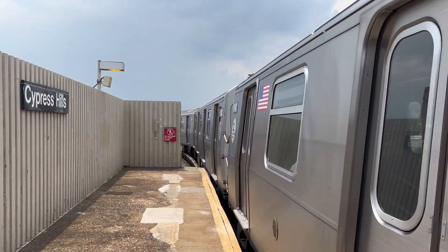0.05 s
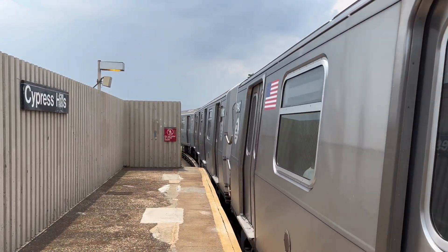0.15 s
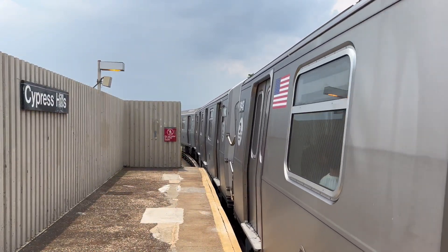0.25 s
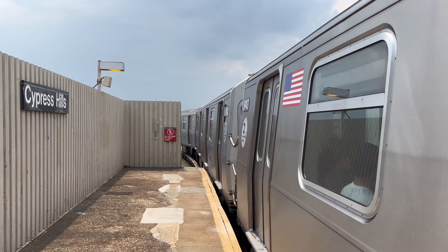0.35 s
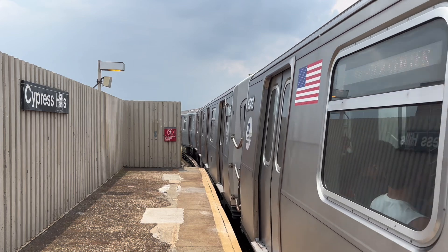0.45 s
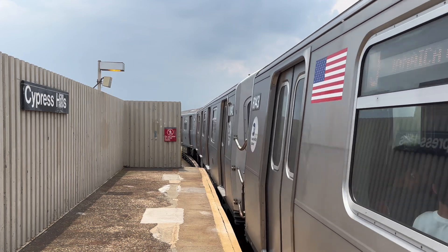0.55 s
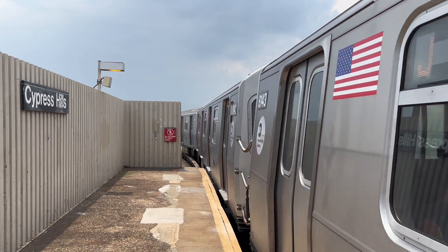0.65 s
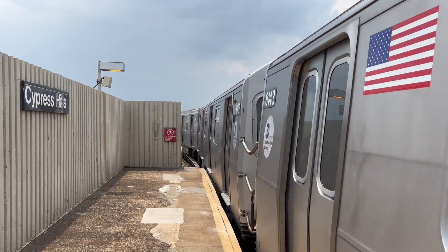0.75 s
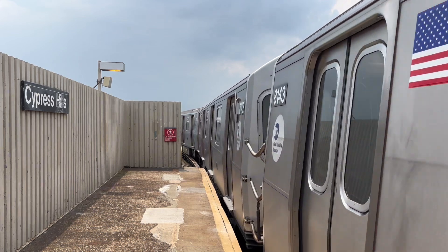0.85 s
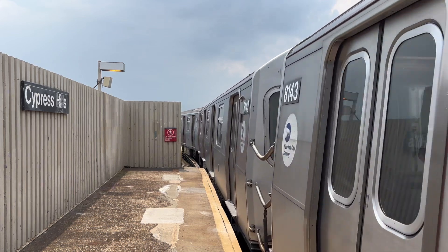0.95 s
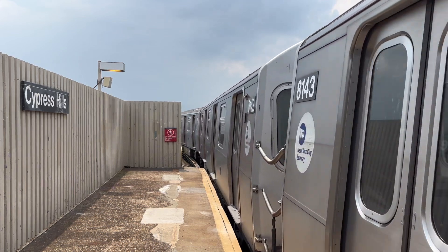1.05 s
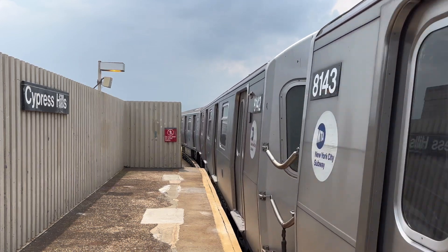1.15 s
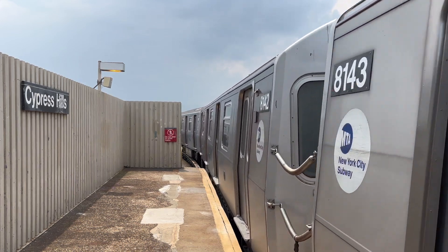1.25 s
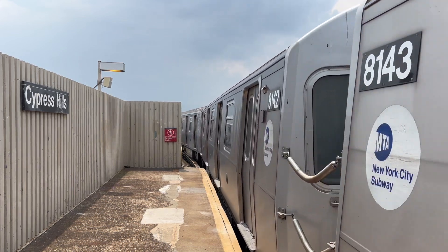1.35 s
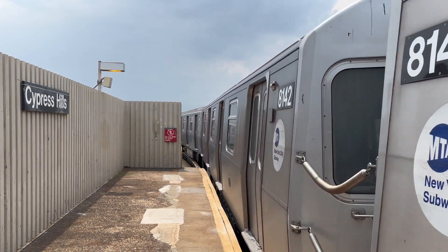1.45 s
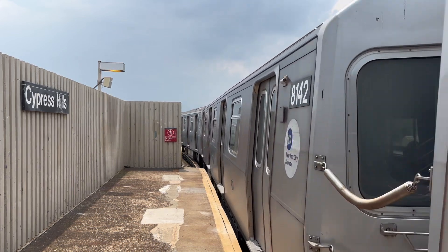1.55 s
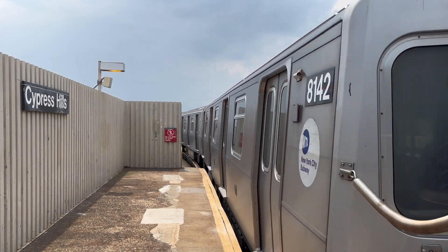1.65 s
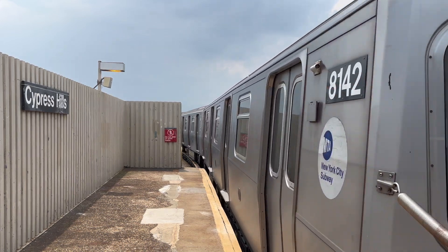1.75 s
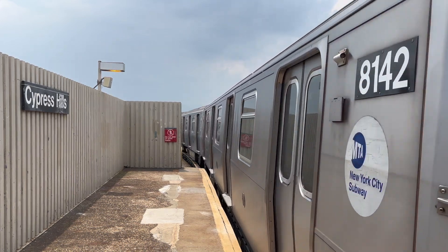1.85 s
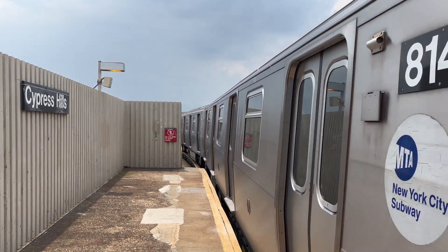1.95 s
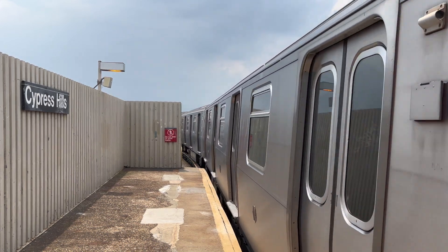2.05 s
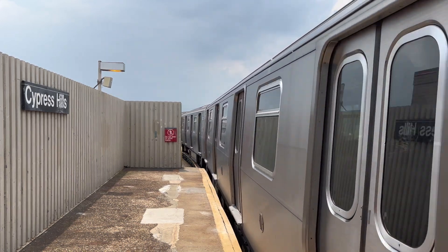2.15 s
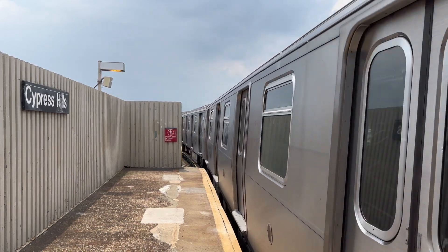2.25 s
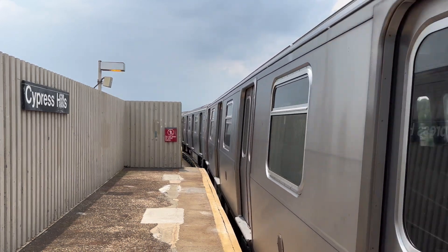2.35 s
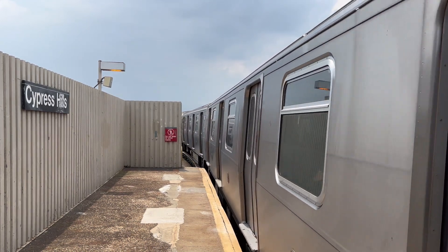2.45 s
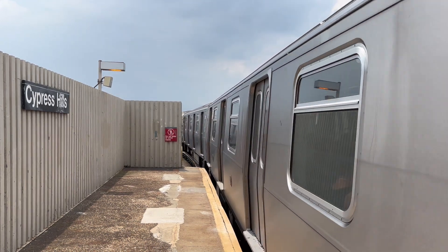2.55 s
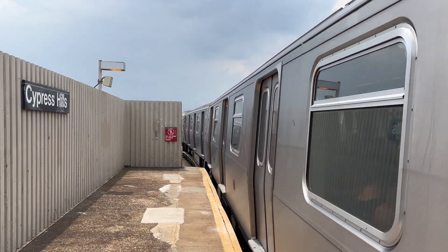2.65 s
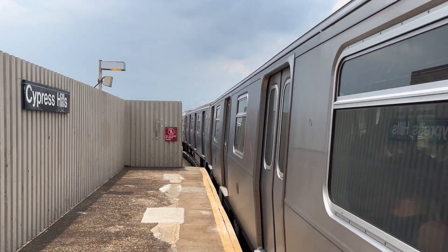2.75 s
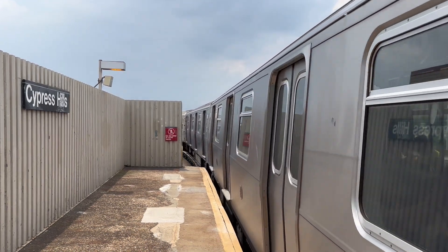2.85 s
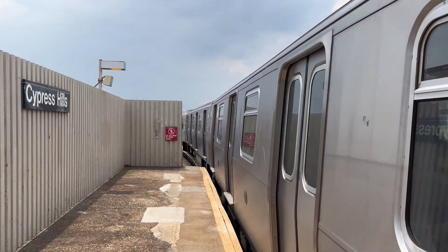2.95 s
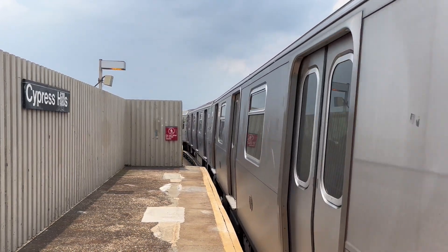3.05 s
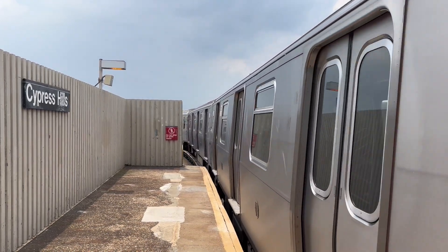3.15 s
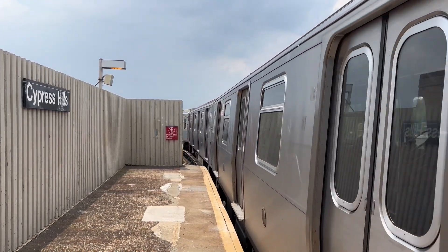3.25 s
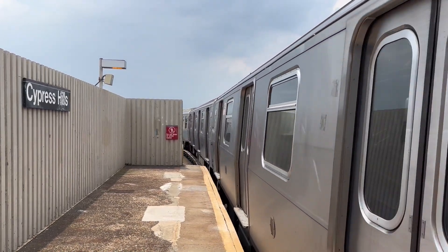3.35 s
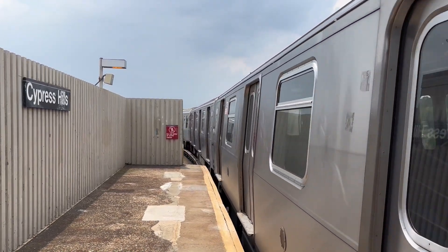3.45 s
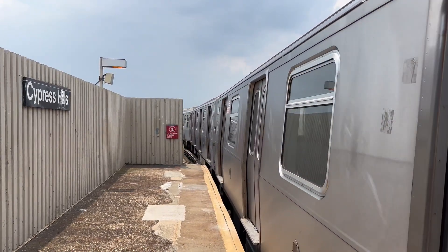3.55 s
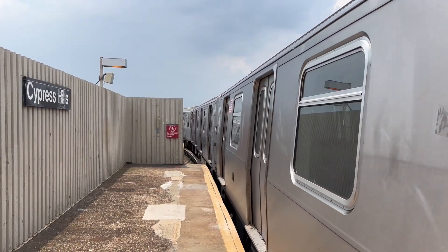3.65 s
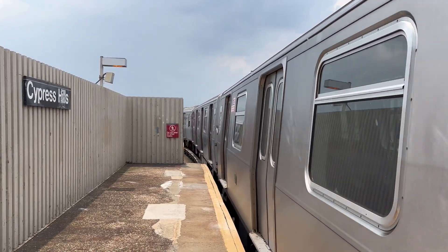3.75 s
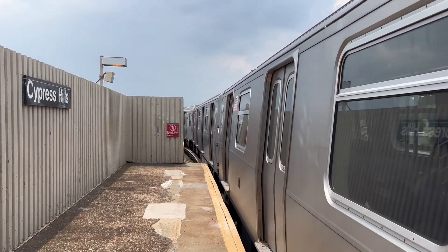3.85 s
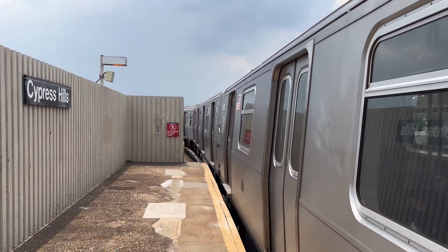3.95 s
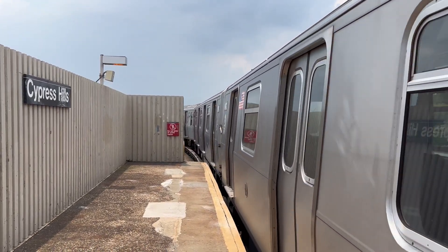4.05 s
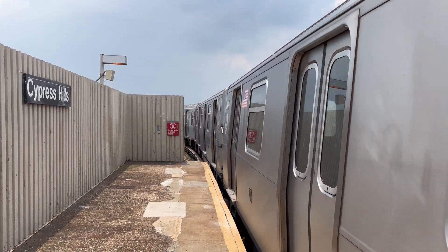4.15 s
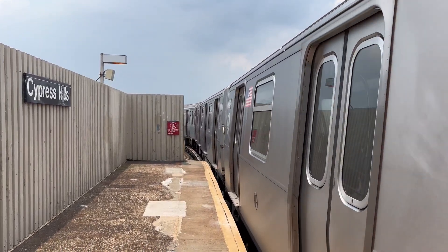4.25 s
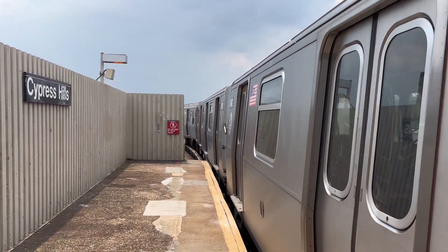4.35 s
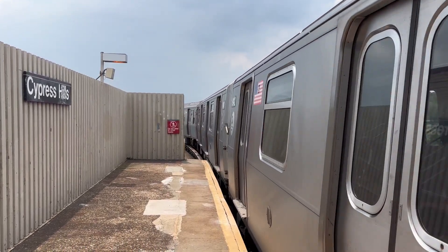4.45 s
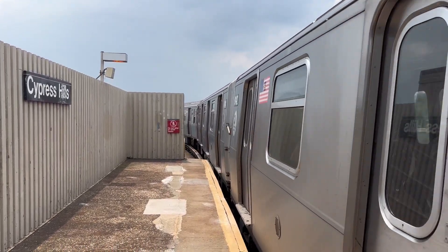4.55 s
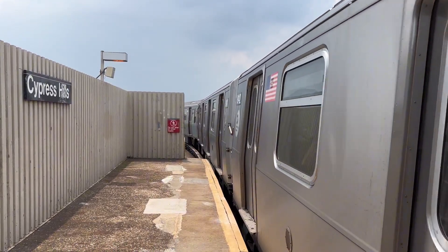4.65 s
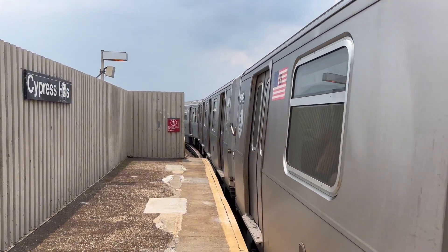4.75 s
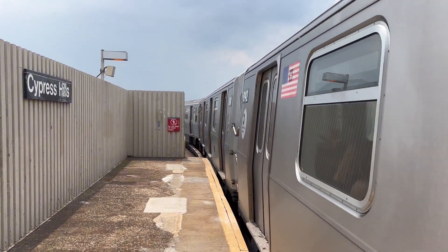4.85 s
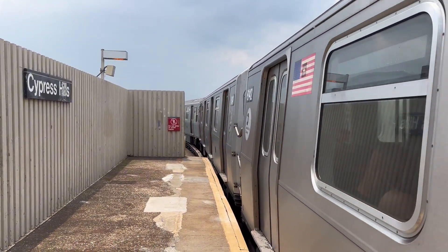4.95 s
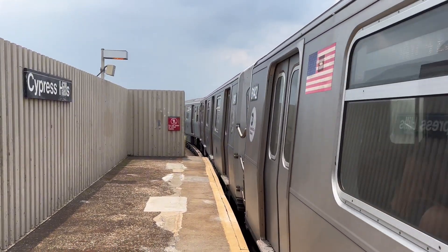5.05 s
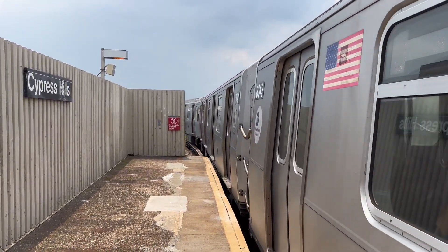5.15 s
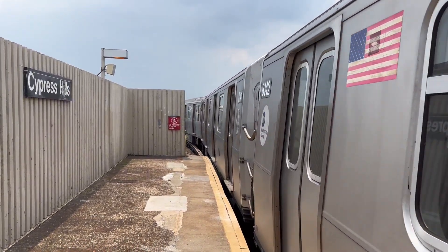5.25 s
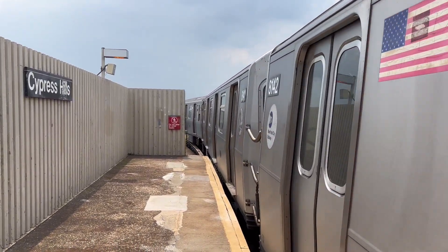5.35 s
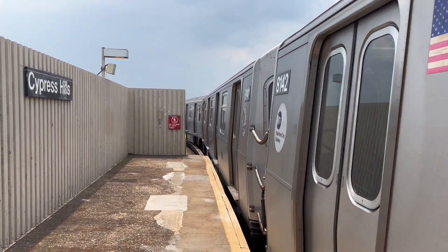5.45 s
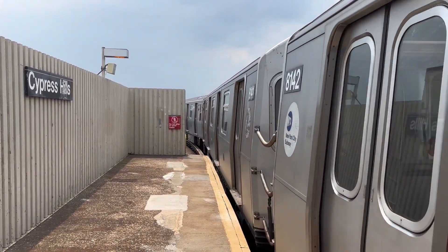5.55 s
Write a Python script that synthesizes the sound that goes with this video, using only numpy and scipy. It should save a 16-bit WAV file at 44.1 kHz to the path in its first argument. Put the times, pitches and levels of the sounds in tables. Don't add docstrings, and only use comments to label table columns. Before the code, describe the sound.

Close metal train wheels roll by with deep rumble and clustered clack-thuds, loose metal clinks, and high wheel squeal in two successive pitches.

```python
import sys
import numpy as np
from scipy import signal
from scipy.fft import rfft, irfft
from scipy.io import wavfile
from scipy.ndimage import uniform_filter1d

SR = 44100
rng = np.random.default_rng(int(sys.argv[2]) if len(sys.argv) > 2 else 0)


def store_wav(level_fs):
    pcm = np.round(np.clip(np.atleast_2d(level_fs), -1, 1) * 32767)
    wavfile.write(sys.argv[1], SR, pcm.T.astype(np.int16))


def level_to_linear(level):
    exponent = np.asarray(level, float) / 20
    return 10 ** exponent


N = 247401
T = np.arange(N) / SR
HZ = np.fft.rfftfreq(250000, 1 / SR)[1:]

# frequency in Hz, density in dB per Hz.
ROLL_COLOUR = [(20, -24), (36, -11), (52, 3.5), (90, -0.5), (220, -6), (580, -18), (1000, -22.5),
               (2560, -34), (4500, -39.5), (8200, -47), (10000, -48), (12500, -53.5), (15000, -52.5),
               (16000, -63)]
# time in seconds, level in dB.
TRUCK_LEVEL = [(0.0, -35.5), (0.28, -31), (0.47, -34), (1.22, -35.5), (1.37, -29), (1.75, -39.5),
               (1.87, -31.5), (2.22, -34), (2.94, -40), (3.17, -32.5), (3.33, -39), (3.7, -33.5),
               (3.81, -38.5), (4.06, -41), (4.27, -37.5), (4.69, -40), (4.89, -36), (5.61, -37.5)]
# frequency in Hz, dB per dB.
NEARNESS_SHARE = [(60, 0.7), (220, 0.62), (1000, 0.64), (4000, 0.85)]
# start in seconds, clack in dB, thud in dB, crack in dB, span in Hz.
JOINT_KNOCKS = [(0.199, -14.5, -7.5, -22, 184), (0.298, -20, -12.5, -32, 186), (0.398, -21, -42, -38, 215),
                (0.679, -11.5, -9, -23.5, 159), (0.739, -46, -15, -49, 109), (0.902, -22, -16.5, -35.5, 138),
                (1.328, -17, -7.5, -24, 167), (1.412, -19.5, -8.5, -29, 151),
                (1.697, -18.5, -13.5, -21.5, 159), (1.82, -11.5, -11.5, -25, 179),
                (1.888, -17.5, -5.5, -38, 172), (1.963, -17, -25, -47, 245), (4.685, -18.5, -9.5, -25, 181),
                (4.739, -23.5, -9, -33.5, 204), (4.805, -21, -16, -46, 141), (4.969, -36, -22, -44, 162),
                (5.226, -12, -14, -24, 144), (5.26, -29.5, -9, -41, 167.5),
                (0.02, -38, -37, -32, 127), (1.085, -23.5, -13, -46, 154), (1.512, -22, -13.5, -33, 160),
              (2.2, -24, -13, -48, 147), (2.413, -28, -18, -52, 169), (2.469, -20.5, -14, -32.5, 113),
              (2.583, -22, -10, -29, 144), (3.001, -19.5, -11.5, -55, 112), (3.086, -19.5, -11, -41, 222),
              (3.158, -25, -25, -43, 110), (3.493, -37, -20, -34, 205), (3.55, -21, -18, -46, 174),
              (3.675, -19.5, -19.5, -36, 166), (4.213, -27.5, -12, -65, 241), (4.27, -22, -21, -38, 111),
              (4.346, -35, -26, -52, 162)]
# frequency in Hz, t60 in seconds.
KNOCK_T60 = [(60, 0.084), (200, 0.53), (1000, 0.33), (4000, 0.29), (12000, 0.14)]
# frequency in Hz, rise in seconds.
KNOCK_RISE = [(60, 0.075), (200, 0.013), (1000, 0.0092), (12000, 0.00055)]
# frequency in Hz, level in dB, t60 in seconds.
RAIL_MODES = [(512, 10.5, 0.095), (685, 12, 0.042), (840, -18, 0.038), (960, -35, 0.091),
              (1043, -28, 0.044), (1204, 5, 0.089), (1313, 3.5, 0.1), (1446, 8.5, 0.054), (1652, 2.5, 0.11),
              (1830, -15, 0.054), (1928, 2, 0.17), (2044, 0.5, 0.1), (2370, -8, .06), (2440, -29, 0.02),
              (2920, -15, 0.032), (3350, -22, 0.046), (4520, -3.5, 0.051)]
# frequency in Hz, level in dB, t60 in seconds.
GIRDER_MODES = [(51, -10, 0.15), (91, 6.5, 0.21), (146.5, 12, 0.29), (205, 14.5, 0.18), (243, -10, 0.24),
                (333, -29, 0.042), (433.4, 8.5, 0.12)]
# start in seconds, peak in dB, pitch in Hz.
HEAVES = [(0.233, -13, 56.5), (0.309, -11.5, 52), (0.539, -15.5, 69.5), (0.711, -10.5, 56.6),
          (0.898, -17, 83.4), (1.069, -16.5, 69.6), (1.419, -11, 50.5), (1.7, -12, 75.4), (1.85, -14, 54.2),
          (1.949, -19, 53.8), (2.099, -16, 48.1), (2.315, -16, 69), (2.449, -14.5, 85.6), (2.55, -13, 49.7),
          (2.698, -19, 65), (2.823, -27, 60.5), (2.98, -20, 68.5), (3.254, -18, 51.1), (3.55, -18, 81),
          (3.649, -16, 55.7), (3.818, -12, 58.8), (4.199, -24, 47), (4.319, -15.5, 77.3), (4.72, -10.5, 46),
          (4.829, -12.5, 57), (4.959, -12.5, 48.4), (5.257, -8, 57), (5.399, -17, 61.9), (5.499, -22, 73.4)]
# time in seconds, level in dB.
LOW_SQUEAL = [
    (1.1, -59),
    (1.37, -50.5),
    (2.12, -38.5),
    (2.37, -47),
    (2.43, -39.5),
    (3.56, -42),
    (3.75, -47.5),
    (3.85, -56),
    (4.15, -68),
]
# time in seconds, level in dB.
HIGH_SQUEAL = [
    (3.1, -67),
    (3.88, -57),
    (3.94, -53),
    (4.36, -47.5),
    (4.76, -46.5),
    (5.06, -66),
    (5.2, -60),
    (5.25, -54),
    (5.61, -55),
]
# frequency in Hz, width in Hz, level in dB.
LOW_SQUEAL_MODES = [(4921, 16, 0), (4830, 30, -3), (4875, 50, -4), (4985, 50, -10)]
# frequency in Hz, width in Hz, level in dB.
HIGH_SQUEAL_MODES = [(6586, 16, 0), (6500, 30, -5), (6540, 60, -6)]
# frequency in Hz, width in Hz, level in dB.
WHEEL_MODES = [(3007, 105, -55), (465.6, 49, -40), (49.3, 50, -34.5), (3855, 460, -58)]
# frequency in Hz, width in Hz, level in dB.
HUM_MODES = [(2020, 300, -3), (2500, 110, 0), (6045, 22, 0)]
# rolling in dB, knock in dB, knock t60 in seconds,
# leaving wheel in dB, its fade in dB per second.
HUM_DRIVE = [(-52, -18, 0.54, -47, 19), (-84, -51, 0.24, -39.5, 19), (-75, -39.5, 0.45, -69.5, -0.8)]
# start in
# seconds, frequency in Hz, level in dB, t60 in seconds, width in Hz.
RINGS = [(.30, 8470, -44, 0.61, 71), (.30, 7150, -45, 0.39, 121), (.689, 8200, -37, 0.17, 91),
         (5.05, 478, -26, 0.54, 39), (1.04, 6820, -44, 0.37, 161), (1.28, 1296, -17.5, 0.15, 23),
         (1.335, 1260, -22.5, 0.25, 60), (1.696, 11000, -36, 0.043, 11000), (1.699, 600, -15, 0.18, 160),
         (.70, 3350, -31.5, 0.17, 72), (2.11, 9000, -53, .06, 11000), (1.697, 8700, -29.5, 0.14, 200),
         (1.697, 14000, -43, .16, 401), (1.829, 8360, -40, 0.34, 91), (1.899, 6620, -36.5, 0.29, 91),
         (2.464, 1080, -26, 0.39, 220), (4.531, 8601, -46, .11, 401), (4.225, 350, -16.5, 0.39, 210),
         (2.575, 166, -14, .2, 100), (1.1, 2010, -39, 0.95, 180), (5.05, 2040, -39, 1, 160),
         (4.971, 8251, -43, 0.12, 301), (5.235, 7300, -35, 0.28, 330), (5.258, 12000, -46, 0.24, 280)]
# start in seconds, frequency in Hz, level in dB.
SQUEAKS = [
    (.91, 4300, -36.5),
    (3.5, 4300, -38),
    (3.6, 4200, -37),
    (4.39, 4000, -41),
    (4.605, 3820, -40),
    (4.97, 4070, -41),
]
# start in seconds, length in seconds, level in dB.
WHINE = [
    (0.016, 0.058, -34),
    (0.087, 0.12, -30.5),
    (0.285, 0.075, -26.5),
    (0.372, .06, -35),
    (0.452, 0.069, -37.5),
]
# frequency in Hz, likeness from 0 to 1.
LIKENESS = [(30, 0.94), (60, 0.99), (90, 1), (150, 0.77), (290, 0.9), (640, 0.03), (1410, 0.5),
            (3100, 0.56), (5500, 0.46), (6400, 0.8), (9000, 1), (15000, 1)]
# frequency in Hz, left minus right in dB.
PORT_BALANCE = [(60, -1.5), (110, -0.5), (200, 0.5), (380, -0.5), (700, -0.5), (1290, 3), (2380, 2.5),
                (4400, 3.5), (8120, -0.5), (15000, 0)]
# frequency in Hz, left lead in radians.
PORT_PHASE = [(20, 0), (1000, 0), (1700, -.9), (2500, 0), (3300, .7), (4800, .4), (5600, -.5), (6200, 0),
              (7400, 0), (10000, -3.1), (12800, -6.3), (15400, -9.4)]

SHARP_DB = -22.5


def along(table, hz):
    freqs, values = np.transpose(table)
    return np.interp(np.log(hz), np.log(freqs), values)


def unit(x):
    return x / np.sqrt(np.mean(x ** 2))


def pair(shape):
    real, imag = rng.standard_normal((2, 2, len(HZ)))
    mid, side = (real + 1j * imag) * shape
    like = np.clip(along(LIKENESS, HZ), 0, 1)
    mid, side = mid * np.sqrt(1 + like), side * np.sqrt(1 - like)
    spectra = np.pad([mid + side, mid - side], ((0, 0), (1, 0)))
    return unit(irfft(spectra)[:, :N])


def modes(table):
    power = 0
    for hz, width, db in table:
        detuning = 2 * (HZ - hz) / width
        power = power + level_to_linear(db) ** 2 / width / (1 + detuning ** 2) ** 2
    return np.sqrt(power)


def walk(rate):
    hold = int(SR / rate)
    steps = np.repeat(rng.standard_normal(400), hold)[:N]
    return 1.3 * uniform_filter1d(uniform_filter1d(steps, hold), hold)


def blow(start, rise, t60):
    first = int(start * SR)
    t = T[:min(N - first, int(t60 * SR))]
    env = (1 - np.exp(-t / rise)) * np.exp(-np.log(1000) * t / t60)
    return slice(first, first + len(t)), env


def pan(db):
    return level_to_linear(np.array([[db], [-db]]) / 2)


def nearness():
    s, db = np.transpose(TRUCK_LEVEL)
    return np.interp(T, s, db - np.mean(db))


def dullness(crack):
    return max(0, SHARP_DB - crack)


def knocks():
    return [(s, clack, thud, crack, max(.4, 1.28 + 0.0222 * (SHARP_DB - crack)), hz)
            for s, clack, thud, crack, hz in JOINT_KNOCKS]


def track():
    roll_db, soft_per_db = -43, .08
    out, near, shared = 0, nearness(), walk(rate=9)
    for hz in 30 * 2 ** np.arange(0, 9.1, .5):
        wander = 0.6 * shared + 1.17 * walk(rate=18)
        power = level_to_linear(along(NEARNESS_SHARE, hz) * near + roll_db + wander) ** 2
        band = np.maximum(0, 1 - 2 * np.abs(np.log2(HZ / hz))) ** .5
        colour = band * level_to_linear(along(ROLL_COLOUR, HZ))
        power *= np.sum(colour ** 2) * HZ[0]
        for start, clack, thud, crack, tail, _ in knocks():
            knock_colour = [(40, thud - 22), (200, thud - 9), (1100, clack - 11),
                            (4000, crack - 12), (8000, crack - 19), (14000, crack - 23)]
            rise = along(KNOCK_RISE, hz) * (1 + soft_per_db * dullness(crack))
            where, env = blow(start, rise, tail * along(KNOCK_T60, hz))
            power[where] += (level_to_linear(along(knock_colour, hz)) * env) ** 2
        out = out + np.sqrt(power) * pair(colour)
    return out


def struck(table, column, late, rise, spread, detune, loss_db):
    out = np.zeros((2, N))
    chances = rng.standard_normal((len(knocks()), len(table), 4))
    for knock, chance in zip(knocks(), chances):
        dull_loss = 0.13 * dullness(knock[3])
        for (hz, db, t60), (off, size, side, wait) in zip(table, chance):
            where, env = blow(knock[0] + late + .002 * wait ** 2, rise, t60)
            scatter = np.sign(size) * level_to_linear(1.5 * size)
            ring = scatter * env * np.sin(2 * np.pi * hz * (1 + detune * off) * T[:len(env)])
            sides = 1 + spread * side * np.array([[1], [-1]])
            out[:, where] += level_to_linear(knock[column] + db - loss_db - dull_loss) * sides * ring
    return out


def girders():
    out = struck(RAIL_MODES, column=1, late=0, rise=0.0014, spread=0.3, detune=0.0426, loss_db=16.5)
    out += struck(GIRDER_MODES, column=2, late=0.01124, rise=0.0027, spread=.07, detune=0.063, loss_db=15.0)
    span_db, span_t60 = -5.5, .12
    for start, _, thud, _, tail, hz in knocks():
        where, env = blow(start + 0.0092, 0.0076, span_t60 * tail)
        out[:, where] += level_to_linear(thud + span_db) * env * np.sin(2 * np.pi * hz * T[:len(env)])
    return out


def heave():
    out = np.zeros((2, N))
    for start, db, hz in HEAVES:
        where, env = blow(start, rise=0.018, t60=0.35)
        swing = np.sin(2 * np.pi * hz * T[:len(env)])
        out[:, where] += level_to_linear(db - 2) * env / env.max() * swing
    return out


def squeal(pressure, table, flutter_db):
    s, db = np.transpose(pressure)
    out = 0.65 * pair(modes(table))
    for hz, width, mode_db in table:
        phase = 2 * np.pi * np.cumsum(hz + width * walk(rate=51)) / SR
        level = 0.67 * level_to_linear(mode_db + flutter_db * walk(rate=53))
        out += level * np.sin(phase + rng.normal(0, 0.12, (2, 1)))
    return level_to_linear(np.interp(T, s, db, -99, -99)) * out


def rubbed(level, table, flutter_db):
    return level * level_to_linear(flutter_db * walk(rate=18)) * pair(modes(table))


def hum():
    out = 0
    for hz, width, db in WHEEL_MODES:
        out = out + level_to_linear(db + 0.5 * walk(rate=2.63)) * pair(modes([(hz, width, 0)]))
    for mode, (roll_db, knock_db, t60, leaving_db, fade_db) in zip(HUM_MODES, HUM_DRIVE):
        power = level_to_linear(roll_db + nearness()) ** 2 + level_to_linear(leaving_db - fade_db * T) ** 2
        for start, clack, *_ in knocks():
            where, env = blow(start, .01, t60)
            power[where] += (level_to_linear(clack + knock_db) * env) ** 2
        out = out + level_to_linear(mode[2]) * rubbed(np.sqrt(power), [mode], 0.78)
    return out


def rings():
    out, push = np.zeros((2, N)), pair(np.ones(len(HZ)))
    squeaks = [(*chink, 0.25, 790) for chink in SQUEAKS]
    for start, hz, db, t60, width in RINGS + squeaks:
        where, env = blow(start, 0.031 * t60, t60)
        mode = signal.butter(2, [hz - width / 2, hz + width / 2], "band", fs=SR, output="sos")
        out[:, where] += level_to_linear(db) * env * unit(signal.sosfilt(mode, push[:, where]))
    return out


def whine():
    pitch_hz, edge_s = 1004, 0.022
    on = sum(level_to_linear(db) * (T >= start) * (T < start + length) for start, length, db in WHINE)
    phase = 2 * np.pi * np.cumsum(pitch_hz + 1.8 * walk(rate=29)) / SR
    return pan(2.5) * uniform_filter1d(on, int(edge_s * SR)) * np.sqrt(2) * np.sin(phase)


def scene():
    squeals = pan(2.3) * squeal(LOW_SQUEAL, LOW_SQUEAL_MODES, 3.3)
    squeals += pan(0.53) * squeal(HIGH_SQUEAL, HIGH_SQUEAL_MODES, 1.7)
    return track() + girders() + heave() + squeals + hum() + rings() + whine()


def roll_off(x):
    return signal.sosfilt(signal.butter(12, 15710, fs=SR, output="sos"), x)


def record(dry):
    hz, phase = np.transpose(PORT_PHASE)
    balance = level_to_linear(along(PORT_BALANCE, HZ) / 2)
    skew = np.r_[1, balance * np.exp(.5j * np.interp(HZ, hz, phase))]
    ports = irfft(rfft(dry, 2 * len(HZ)) * np.array([skew, 1 / skew]))[:, :N]
    mix = np.tanh(0.7 * ports) / 0.7
    return roll_off(mix)


dry = scene()
out = record(dry)
store_wav(out)
```